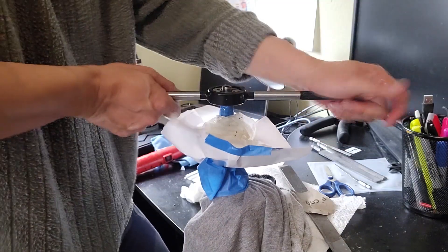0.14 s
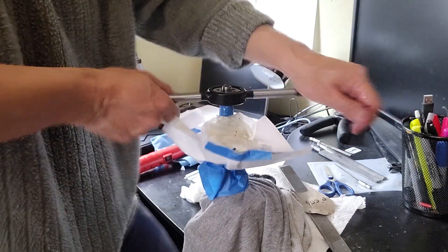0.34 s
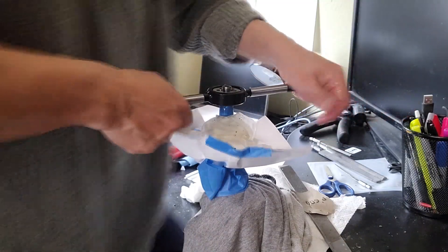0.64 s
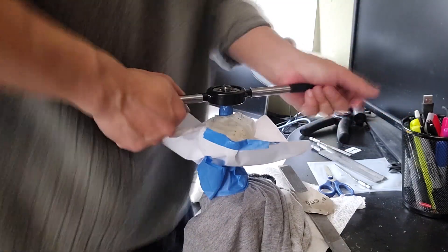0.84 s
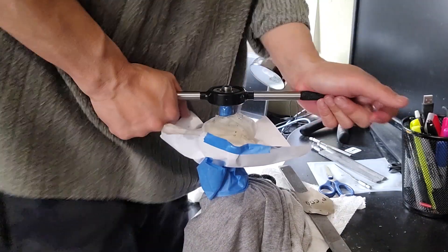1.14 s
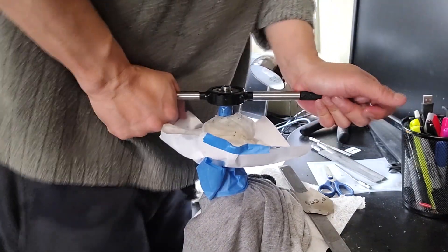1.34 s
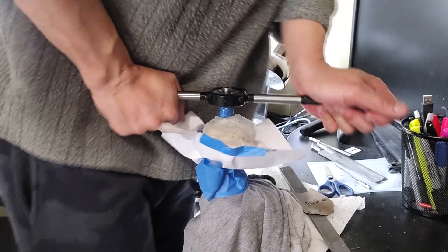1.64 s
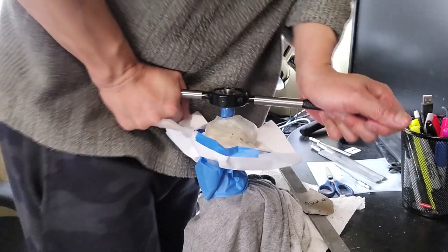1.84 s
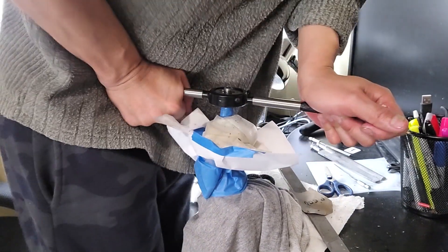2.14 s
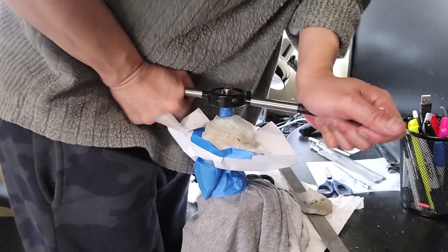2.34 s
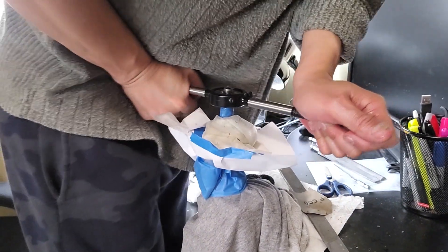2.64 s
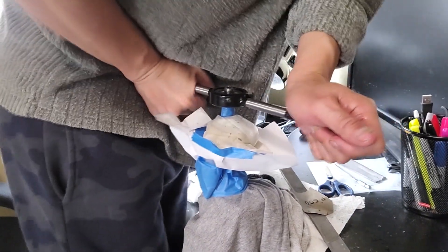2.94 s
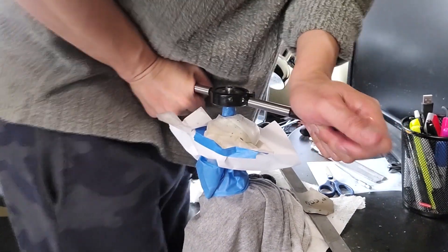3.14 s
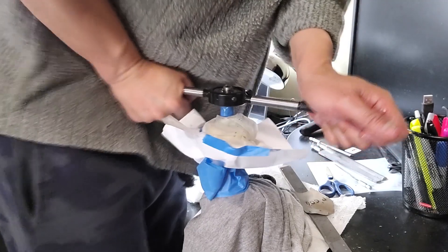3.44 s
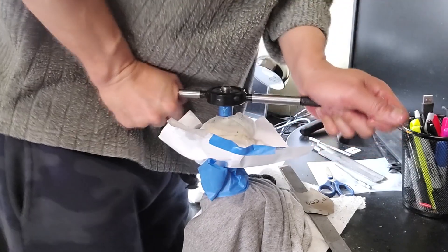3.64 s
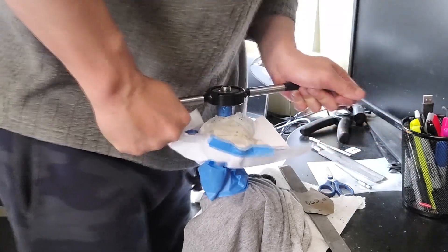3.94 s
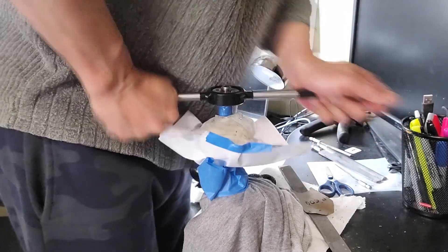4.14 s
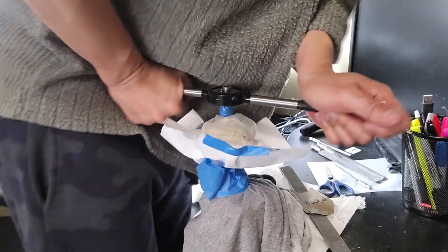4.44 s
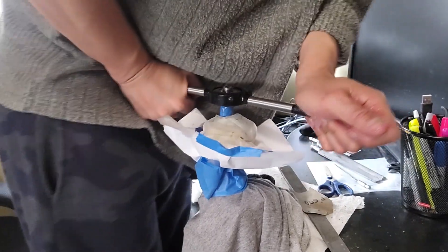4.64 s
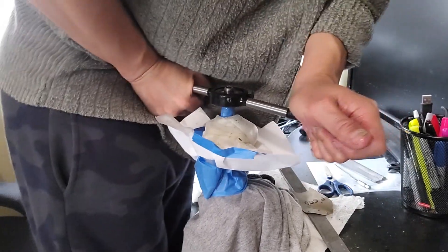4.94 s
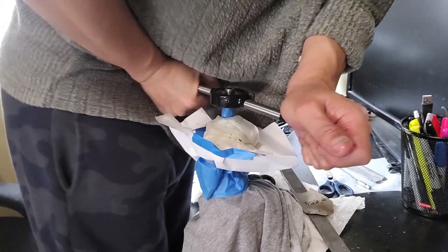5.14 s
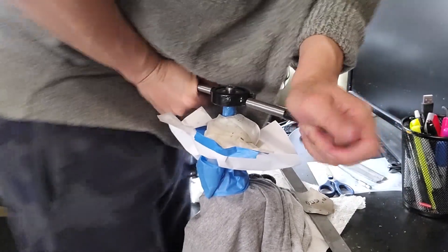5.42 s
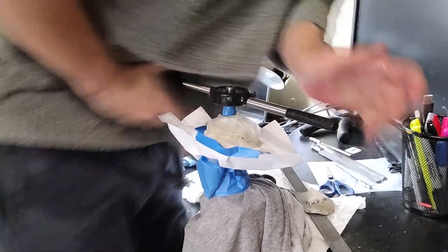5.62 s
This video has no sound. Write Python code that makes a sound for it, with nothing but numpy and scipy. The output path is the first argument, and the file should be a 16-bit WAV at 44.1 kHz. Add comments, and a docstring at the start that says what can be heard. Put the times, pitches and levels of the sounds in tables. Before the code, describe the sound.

Uneven dull knocks and sharp steel clicks from a hand-turned die clamped at a desk, with sleeve brushing paper and faint creaks.

```python
"""A sweater brushes a paper collar over faint grinding and room hush: flickering fibre noise, filtered ticks.
A hand die is worked round an oiled steel barrel clamped upright at a desk in a small room.
The die slips in short judders that ring clamp and desk as damped modes; it chinks and creaks in its holder.
The steel stock clicks in its play: bursts of tiny contacts, filtered; palms rub hollowly on the grips."""
import sys
import numpy as np
from scipy import signal
from scipy.fft import rfft, irfft, next_fast_len
from scipy.io import wavfile
from scipy.ndimage import uniform_filter1d

SR = 44100
rng = np.random.default_rng(int(sys.argv[2]) if len(sys.argv) > 2 else 0)


def file_out(sig):
    """Save sig as 16-bit WAV at sys.argv[1]."""
    # one column per channel
    cols = np.atleast_2d(sig).T
    # limit, then scale
    lim = np.clip(cols, -1, 1)
    pcm = np.round(lim * 32767).astype(np.int16)
    wavfile.write(sys.argv[1], SR, pcm)


N = 254898
TIME = np.arange(N) / SR
HIT_SIZE = 16384  # samples in one hit or room response
TOP_HZ = 15900

# rasp of steel faces: freq_hz, level_db
GRIT_COLOUR = [(500, -11), (1200, -29), (3000, 5), (6000, 4.5), (9000, 3), (15000, -19)]


def undb(db):
    """Decibels to gain."""
    return 10 ** (np.asarray(db) / 20)


def unit(x):
    """Scale to rms 1."""
    return x / np.sqrt(np.mean(x ** 2))


def crest(x, size):
    """Scale so that the loudest stretch of this many samples has rms 1."""
    power = np.mean(np.atleast_2d(x) ** 2, axis=0)
    return x / np.sqrt(uniform_filter1d(power, size, mode="constant").max())


def colour(x, points):
    """Causal minimum-phase filter through (freq_hz, level_db) points."""
    n = x.shape[-1]
    hz, db = np.transpose(points)
    log_hz = np.log(np.fft.rfftfreq(n, 1 / SR) + 1)
    gain = undb(np.interp(log_hz, np.log(hz), db))
    cepstrum = irfft(np.log(gain), n)
    # fold the cepstrum to positive time
    cepstrum[1:n // 2] *= 2
    cepstrum[n // 2 + 1:] = 0
    return irfft(rfft(x) * np.exp(rfft(cepstrum)), n)


def walk(knots_per_s):
    """Random level with straight lines between normal draws."""
    knots = np.arange(0, N / SR + 1, 1 / knots_per_s)
    return np.interp(TIME, knots, rng.standard_normal(len(knots)))


def spread(pair, wide_hz=560, bass_width=0.0067):
    """Two unrelated signals as a diffuse field: alike in the bass, different in the treble."""
    high_pass = signal.butter(1, wide_hz, "high", fs=SR, output="sos")
    side = signal.sosfilt(high_pass, pair[1]) + bass_width * pair[1]
    return pair[0] + np.array([side, -side])


def tilt(left_db):
    """Stereo gains: left raised and right lowered by left_db."""
    return undb(np.array([[left_db], [-left_db]]))


def ports(x, lead_rad=0.47):
    """The two microphone ports differ slightly: the left one shifts the phase a little ahead of the right."""
    analytic = signal.hilbert(x, next_fast_len(N))[:N]
    return np.real(analytic * np.exp(np.array([[1j], [-1j]]) * lead_rad / 2))


def add(track, s, sound):
    """Mix a sound in at time s."""
    start = int(s * SR)
    part = sound[..., :N - start]
    track[..., start:start + part.shape[-1]] += part


def reflections(build_s=0.0055):
    """One stereo path through a small furnished room: noise decaying by band, unit energy."""
    # reverberation: freq_hz, t60_s
    room_t60 = [(100, 0.51), (500, 0.36), (3000, 0.31), (14000, 0.18)]
    t = np.arange(HIT_SIZE) / SR
    hz, t60_s = np.transpose(room_t60)
    edges_hz = np.geomspace(20, SR / 2, 9)
    bins_hz = np.fft.rfftfreq(HIT_SIZE, 1 / SR)
    noise = rfft(rng.standard_normal((2, HIT_SIZE)))
    tail = 0
    for lo, hi in zip(edges_hz, edges_hz[1:]):
        decay_s = np.interp(np.log(lo * hi) / 2, np.log(hz), t60_s)
        band = irfft(noise * (bins_hz >= lo) * (bins_hz < hi))
        tail = tail + band * np.exp(-np.log(1000) * t / decay_s)
    build_up = 1 - np.exp(-t / build_s)
    return unit(spread(tail * build_up)) / np.sqrt(HIT_SIZE)


def room(x):
    """What the room returns of a sound."""
    return signal.fftconvolve(x[None], reflections(), axes=1)[:, :N]


def air(level_db=-71.5):
    """Faint hush of the room: coloured stereo noise with a slight waver."""
    # hush colour: freq_hz, level_db
    air_colour = [(15, -7), (25, -1), (59, -2), (136, -9), (193, -11), (297, -10), (410, -17.5), (804, -30),
                  (1020, -26), (1530, -29.5), (5280, -35.5), (11800, -35), (15500, -37)]
    hush = spread(colour(rng.standard_normal((2, N)), air_colour))
    return unit(hush) * undb(level_db + .5 * walk(22))


def grinding(flutter_db=4.0, room_db=-6, slips_per_s=1200):
    """Countless small slips of the cutting edges through the thread keep the clamp grumbling."""
    # steady grinding: time_s, level_db
    grind_level = [(0.0, -75.5), (0.76, -71), (0.9, -65), (1.11, -64), (1.26, -68.5), (1.66, -74.5),
                   (2.19, -56), (2.45, -73), (2.88, -73.5), (3.2, -53.5), (3.36, -60), (3.67, -68),
                   (4.02, -56.5), (4.13, -64), (4.7, -59), (5.13, -63), (5.29, -71), (5.42, -51),
                   (5.58, -55), (5.78, -62)]
    # its colour: freq_hz, level_db
    grind_colour = [(18, -47.5), (30, -28), (113, 0), (162, -5.5), (191, -11), (260, 0), (322, 1),
                    (412, -11.5), (535, -9.5), (610, -20), (874, -24), (1120, -31), (1500, -38),
                    (2200, -50), (3300, -80)]
    ticks = rng.standard_normal(N) * (rng.random(N) < slips_per_s / SR)
    ticks = ticks * undb(flutter_db * walk(25.007))
    level_db = np.interp(TIME, *np.transpose(grind_level))
    out = unit(colour(ticks, grind_colour)) * undb(level_db)
    return ports(out) + undb(room_db) * room(out)


def fibres(points, grain_db=1.0, flutter_db=3.2, catches_per_s=90):
    """Wool fibres and skin catch and let go in a dense, uneven run of tiny ticks."""
    ticks = rng.standard_normal(N) * (rng.random(N) < .15)
    grains = ticks * undb(grain_db * np.minimum(rng.exponential(size=N), 6))
    return colour(grains * undb(flutter_db * walk(catches_per_s)), points)


def stroke(s, rise_s, fall_s, depth_db=20):
    """Gain of one sliding movement: swells by depth_db over the rise, loses as much over the fall."""
    away = np.maximum((s - TIME) / rise_s, (TIME - s) / fall_s)
    return undb(-depth_db * np.minimum(away, 10))


def rubbing(grip_q=18, grip_db=-4.5):
    """Palms rub on the grips; each cupped hand adds its own hollow resonance."""
    # skin on grip: freq_hz, level_db
    rub_colour = [(200, -54), (450, -13.5), (800, -11), (1080, -13.5), (1400, -19), (2500, -21.5),
                  (6000, -30)]
    # palms sliding round the handles: peak_s, rise_s, fall_s, level_db, hollow_hz
    rub_strokes = [(0.382, 0.027, 0.04, -66, 1000), (0.436, 0.012, 0.035, -62, 1040),
                   (0.476, 0.035, 0.03, -56, 1090), (0.632, 0.03, 0.04, -60, 1040),
                   (0.71, 0.04, 0.03, -55, 1230), (0.75, 0.02, 0.06, -66, 850),
                   (3.846, 0.03, 0.04, -63, 2800), (3.884, 0.025, 0.03, -65, 3500),
                   (3.912, 0.018, 0.05, -51, 1200), (3.972, 0.06, 0.05, -56, 900)]
    skin = unit(fibres(rub_colour))
    out = 0
    for s, rise_s, fall_s, db, hz in rub_strokes:
        hollow = unit(signal.lfilter(*signal.iirpeak(hz, grip_q, fs=SR), skin))
        rub = unit(skin + undb(grip_db) * hollow)
        out = out + undb(db) * stroke(s, rise_s, fall_s) * rub
    return out


def brushing(split_hz=5500, trim_db=-4, rub_db=-2, room_db=2, rub_room_db=-7, left_db=1):
    """Sweater fibres drag over the paper collar, rustling low and hissing high; palms rub on the grips."""
    # sweater on paper, levels before trim: peak_s, rise_s, fall_s, rustle_db, hiss_db
    brush_strokes = [(0.01, 0.2, 0.015, -66, -75), (0.385, 0.028, 0.046, -90, -72),
                     (0.436, 0.011, 0.048, -84, -64), (0.47, 0.032, 0.014, -50.5, -52.5),
                     (0.57, 0.05, 0.079, -63.5, -66), (0.77, 0.066, 0.9, -68.5, -70.5),
                     (0.995, 0.072, 0.045, -57.5, -63), (1.036, 0.05, 0.028, -60.5, -58),
                     (1.105, 0.065, 0.051, -70, -61), (1.22, 0.22, 0.18, -74, -77),
                     (1.5, 0.26, 0.99, -95, -95), (1.73, 0.2, 0.056, -78.5, -100),
                     (1.88, 0.052, 0.23, -79, -74), (2.185, 0.03, 0.035, -80, -74),
                     (3.842, 0.027, 0.15, -72.5, -70), (3.934, 0.039, 0.035, -53.5, -56),
                     (3.99, 0.04, 0.035, -73, -63), (4.205, 0.074, 0.097, -67, -56),
                     (4.7, 0.6, 0.2, -84, -79.5), (5.16, 0.073, 0.16, -85, -95)]
    # paper: freq_hz, level_db
    brush_colour = [(500, -15.5), (1400, -13), (3200, -11), (6000, -10), (9000, -9.5), (12000, -5),
                    (15500, -20.5)]
    paper = fibres(brush_colour)
    low_pass = signal.butter(3, split_hz, "low", fs=SR, output="sos")
    high_pass = signal.butter(3, split_hz, "high", fs=SR, output="sos")
    rustle = unit(signal.sosfilt(low_pass, paper))
    hiss = unit(signal.sosfilt(high_pass, paper))
    brush = np.zeros(N)
    for s, rise_s, fall_s, rustle_db, hiss_db in brush_strokes:
        mix = rustle * undb(rustle_db + trim_db) + hiss * undb(hiss_db + trim_db)
        brush += stroke(s, rise_s, fall_s) * mix
    rub = undb(rub_db) * rubbing()
    wet = room(undb(room_db) * brush + undb(rub_room_db) * rub)
    return (brush + rub + wet) * tilt(left_db)


def ring(push, modes, detune=0.05, scatter_db=2):
    """Damped modes; their pitch and share vary with load and contact point, drawn at random."""
    t = np.arange(HIT_SIZE) / SR
    chance = rng.standard_normal((len(modes), 2))
    body = np.zeros(HIT_SIZE)
    for (hz, db, t60_s), (pitch_draw, level_draw) in zip(modes, chance):
        envelope = undb(db + scatter_db * level_draw - 60 * t / t60_s)
        body += envelope * np.sin(2 * np.pi * hz * (1 + detune * pitch_draw) * t)
    return signal.fftconvolve(push, body)[:HIT_SIZE]


def stutter(length_s, after, count):
    """A first contact, then mostly weaker ones at uneven times."""
    when, size = rng.random(count), rng.standard_normal(count)
    push = np.zeros(HIT_SIZE)
    push[(when * 2 * length_s * SR).astype(int)] = after * size * np.exp(-2 * when)
    push[0] = 1
    return push


def chatter(length_s, grain_db=3):
    """Rough faces meet: a dense burst of tiny contacts that swells at once and dies away."""
    age = np.arange(HIT_SIZE) / SR / length_s
    grains = rng.standard_normal(HIT_SIZE) * undb(grain_db * rng.standard_normal(HIT_SIZE))
    return grains * np.sqrt(age) * np.exp(-2 * age)


def judder(length_s, hz, jitter=0.09, rough_db=3, fade_db=5):
    """Stick-slip jerks that lock to the swing of the clamp and fade as the load lets go."""
    size, late = rng.standard_normal((2, 32))
    when = np.cumsum(1 + jitter * late) / hz
    when -= when[0]
    slipping = np.clip((length_s - when) * hz + 1, 0, 1)
    fade = np.minimum(when / max(length_s, 1 / hz), 2)
    push = np.zeros(HIT_SIZE)
    push[(when * SR).astype(int)] = slipping * undb(rough_db * size - fade_db * fade)
    return push


def slips(clamp_db=-2, desk_db=-4, hard_db=-6, grit_db=-29, room_db=-11, left_db=0.9,
          jolt_s=0.0059, scrape_s=0.018, judder_t60_s=0.029):
    """The die lets go in short, scraping judders that ring the clamp; heavier slips jolt the desk."""
    # slips of the die, levels before trims: start_s, length_s, judder_hz, knock_db, scrape_db
    slip_events = [(0.368, 0.008, 270, -60, -82), (0.771, 0.008, 301, -48.5, -74),
                   (0.831, 0.008, 290, -40, -62), (0.851, 0.014, 306, -25, -40),
                   (0.877, 0.008, 306, -30, -47), (1.227, 0.009, 258, -46, -72),
                   (1.252, 0.009, 258, -50, -76), (1.43, 0.04, 270, -57, -82),
                   (1.715, 0.003, 242, -43, -72), (1.727, 0.003, 260, -41.5, -68),
                   (2.024, 0.025, 270, -49, -60), (2.057, 0.02, 290, -32, -46),
                   (2.179, 0.026, 231, -34, -53), (2.217, 0.01, 265, -36, -56),
                   (2.386, 0.011, 290, -52, -82), (2.604, 0.016, 290, -51, -57),
                   (2.834, 0.02, 265, -40, -67), (2.859, 0.026, 172, -43, -70),
                   (3.043, 0.009, 235, -28.5, -55), (3.063, 0.026, 298, -27, -45),
                   (3.082, 0.016, 310, -30, -48), (3.1, 0.012, 298, -28.5, -48),
                   (3.127, 0.012, 400, -32, -35.5), (3.28, 0.009, 277, -44, -66),
                   (3.388, 0.018, 285, -51, -75), (3.431, 0.009, 285, -32, -50),
                   (3.471, 0.004, 220, -42, -60), (3.608, 0.008, 288, -47.5, -78),
                   (4.007, 0.005, 271, -42, -72), (4.252, 0.012, 279, -42, -62),
                   (4.299, 0.008, 280, -35, -45), (4.324, 0.05, 240, -41, -50),
                   (4.425, 0.018, 270, -43, -58), (4.593, 0.034, 228, -35.5, -64),
                   (4.818, 0.037, 280, -49, -66), (4.987, 0.024, 295, -32.5, -57),
                   (5.06, 0.006, 260, -39, -70), (5.077, 0.018, 212, -45, -75),
                   (5.314, 0.012, 253, -39, -70), (5.335, 0.009, 285, -27.5, -44),
                   (5.356, 0.021, 305, -27.5, -46), (5.374, 0.018, 330, -33, -48),
                   (5.396, 0.016, 270, -36, -51), (5.428, 0.04, 300, -39.5, -54),
                   (5.533, 0.008, 290, -46, -70), (5.607, 0.014, 285, -43, -68)]
    # desk jolts, level before trim: start_s, thud_db, extra_sway_db
    thud_events = [(0.02, -55, 25), (0.854, -34, -5), (0.87, -30, -27), (0.893, -41, 8), (2.033, -49, -17),
                   (2.061, -40.5, -12), (2.182, -46.5, 3), (2.604, -57, -18), (2.846, -50.5, 2.5),
                   (3.045, -43, -30), (3.067, -27, 8), (3.084, -28, 7), (3.123, -31, -12), (3.427, -46, -5),
                   (3.718, -46, 13), (4.299, -34.5, -7), (4.345, -35, 12.5), (4.393, -41, -13),
                   (4.594, -45.5, 12), (5.061, -55.5, 5), (5.336, -25.5, -5), (5.357, -29, -9),
                   (5.395, -30.5, -14), (5.612, -49.5, 12), (5.641, -46.5, -28)]
    # soft push of an oiled slip: freq_hz, level_db
    soft_push = [(40, -25.5), (160, 3), (300, 2), (500, 6), (750, -5), (1500, -42), (3000, -72.5)]
    # push into the desk: freq_hz, level_db
    deep_push = [(20, -24.5), (55, -2), (170, 1), (400, -4), (1000, -51.5)]
    # push of the dry scrape: freq_hz, level_db
    hard_push = [(100, -28), (480, -16.5), (1100, -9), (2500, -12), (6000, -16)]
    # clamp and barrel, relative to the judder: freq_hz, level_db, t60_s
    clamp_modes = [(166, -13.5, 0.18), (216.3, -11, 0.11), (309.4, -19.5, 0.28), (461.6, -33, 0.2)]
    # their ring under the scrape: freq_hz, level_db, t60_s
    hard_modes = [(560, -15.5, 0.027), (733, -4.5, 0.049), (776, -15, 0.044), (930, -8, 0.018),
                  (1233, -4.5, 0.0057)]
    # desk top: freq_hz, level_db, t60_s
    desk_modes = [(78.5, -5, 0.16), (116.4, -5, 0.2), (148.7, -11, 0.16)]
    # desk swaying on its legs, level before the extra: freq_hz, level_db, t60_s
    desk_sway = (46, -6, 0.15)
    out = np.zeros(N)
    for s, length_s, hz, knock_db, scrape_db in slip_events:
        modes = [(hz, 0, judder_t60_s)] + clamp_modes
        knock = ring(colour(judder(length_s, hz), soft_push), modes, detune=0.054)
        add(out, s, undb(knock_db + clamp_db) * crest(knock, size=300))
        scrape = ring(colour(chatter(scrape_s), hard_push), hard_modes)
        add(out, s, undb(scrape_db + hard_db) * crest(scrape, size=300))
        rasp = colour(chatter(scrape_s), GRIT_COLOUR)
        add(out, s, undb(scrape_db + grit_db) * crest(rasp, size=300))
    sway_hz, sway_db, sway_t60_s = desk_sway
    for s, thud_db, extra_db in thud_events:
        push = colour(stutter(jolt_s, after=0.39, count=4), deep_push)
        modes = desk_modes + [(sway_hz, sway_db + extra_db, sway_t60_s)]
        thud = ring(push, modes, detune=0.052)
        add(out, s, undb(thud_db + desk_db) * crest(thud, size=900))
    return ports(out) * tilt(left_db) + undb(room_db) * room(out)


def contact(modes, length_s, detune):
    """One gritty touch of steel on steel: a rasp and the ring that it leaves."""
    push = chatter(length_s)
    ringing = crest(ring(push, modes, detune), size=130)
    rasp = crest(colour(push, GRIT_COLOUR), size=130)
    return crest(ringing + rasp, size=130)


def chinks(contact_s=0.0083, room_db=-5):
    """As the hands let go, the loose die touches its holder lightly and rings for a moment."""
    # chinks: start_s, level_db
    chink_events = [(0.08, -74), (0.097, -76), (0.109, -73), (0.131, -64.5), (0.149, -67.5), (0.159, -57.5)]
    # loose die: freq_hz, level_db, t60_s
    die_modes = [(2100, -3, 0.014), (3480, 4, 0.009), (5080, 9, 0.009), (6500, 4, 0.006), (7830, -2, 0.008),
                 (12100, -3, 0.006)]
    out = np.zeros(N)
    for s, db in chink_events:
        add(out, s, undb(db) * contact(die_modes, contact_s, detune=0.015))
    return out + undb(room_db) * room(out)


def clicks(room_db=-1, left_db=2, stock_reach=1.56):
    """The stock shifts in its play: a chatter of contacts, with the ring damped by the hands."""
    # steel on steel, room before trim: start_s, length_s, ring_db, low_ring_db, crack_db, crack_hz, room_db
    click_events = [(0.7179, 0.0075, -53.5, -50.5, -69, 3480, 0.5),
                    (0.8525, 0.007, -39.5, -40, -47, 5100, 4), (0.864, 0.006, -64, -60, -66, 5000, 2.5),
                    (0.978, 0.018, -54.5, -51.5, -56, 9000, 1),
                    (1.158, 0.0077, -53, -49.5, -54, 10600, -4.5),
                    (1.8611, 0.0021, -60.5, -64, -53.5, 9100, 1), (2.084, 0.0017, -71, -68, -58, 12500, 7),
                    (2.148, 0.0067, -53, -52, -54, 12500, 4), (2.153, 0.0014, -50, -45, -41.5, 6700, -2),
                    (2.164, 0.0072, -46.5, -45.5, -47, 6000, -12.5), (2.6, 0.0071, -54, -50, -59, 6500, 8),
                    (2.928, 0.0023, -77, -69, -89, 5900, -6), (3.0064, 0.0068, -76, -63, -93, 3980, 2),
                    (3.371, 0.0015, -74, -71, -70.5, 6400, 4),
                    (3.4697, 0.0026, -70.5, -60.5, -72.5, 9800, 6),
                    (3.9628, 0.0028, -47.5, -52, -78, 3970, -5.5),
                    (4.1629, 0.0043, -35, -36.5, -35, 5000, -4.5),
                    (4.289, 0.0059, -41, -37, -45.5, 5200, 1), (4.378, 0.0014, -60, -47, -65, 2520, -9),
                    (4.4207, 0.0051, -64.5, -59, -67.5, 9100, 6.5),
                    (4.506, 0.0017, -74, -60, -77, 3000, -3), (4.982, 0.0079, -72, -62, -84, 4040, -2.5),
                    (5.7417, 0.006, -51.5, -72, -53, 6900, 10.5),
                    (5.7444, 0.00092, -47, -56.5, -41.5, 9400, 4), (5.758, 0.025, -43, -52, -41.5, 5660, 7),
                    (5.767, 0.0063, -48, -49, -46, 13000, 4)]
    # stock, many close damped modes: freq_hz, level_db
    stock_colour = [(400, -7), (1000, -25), (1500, -21.5), (1950, 4), (2250, 4), (2900, 3), (3700, -1.5),
                    (4700, -1), (5800, -13.5), (8000, 0), (15000, -22)]
    # its low ring: freq_hz, level_db
    low_colour = [(150, -8), (450, 0), (650, -4.5), (900, -3), (1250, -5.5), (2000, -7.5), (5000, -113)]
    # crack of a contact: multiple_of_crack_hz, level_db
    crack_shape = [(0.12, -68), (0.36, -51), (0.7, -4.5), (1.002, -1), (1.5, -4.5), (2.3, -17.5)]
    out = np.zeros((2, N))
    for s, length_s, ring_db, low_db, crack_db, hz, wet_db in click_events:
        # the handles keep turning, so every click takes its own path through the room
        direct = unit(chatter(length_s)) / np.sqrt(HIT_SIZE)
        push = direct + undb(wet_db + room_db) * reflections()
        # the stock rings up to a multiple of the crack's pitch
        low_pass = signal.butter(3, min(stock_reach * hz, TOP_HZ), fs=SR, output="sos")
        blunted = signal.sosfilt(low_pass, push)
        crack = colour(push, [(multiple * hz, db) for multiple, db in crack_shape])
        add(out, s, undb(ring_db) * crest(colour(blunted, stock_colour), size=130))
        add(out, s, undb(low_db) * crest(colour(push, low_colour), size=130))
        add(out, s, undb(crack_db) * tilt(left_db) * crest(crack, size=130))
    return out


def creak(tick_s=0.0035, room_db=-1):
    """Under rising load the die creeps in its holder in separate gritty stick-slip ticks."""
    # ticks: start_s, level_db
    creak_ticks = [(1.973, -70), (2.011, -77), (2.026, -67), (2.044, -58.5), (2.056, -63), (2.069, -62),
                   (2.098, -68), (2.112, -59), (2.126, -61), (2.135, -57), (2.14, -54.5)]
    # holder under load: freq_hz, level_db, t60_s
    holder_modes = [(1200, 11, 0.012), (1520, 9, 0.023), (3400, 16.5, 0.0037), (4970, -11, 0.01),
                    (5700, 4, 0.013), (6460, 2, 0.016)]
    out = np.zeros(N)
    for s, db in creak_ticks:
        add(out, s, undb(db) * contact(holder_modes, tick_s, detune=0.05))
    return out + undb(room_db) * room(out)


def scene():
    """Die, stock and paper in the quiet room."""
    return air() + grinding() + brushing() + slips() + chinks() + clicks() + creak()


def record(dry):
    """The microphone drops the deepest bass and cuts the top."""
    high_pass = signal.butter(2, 30, "high", fs=SR, output="sos")
    low_pass = signal.ellip(10, .2, 70, TOP_HZ, fs=SR, output="sos")
    return signal.sosfilt(low_pass, signal.sosfilt(high_pass, dry))


dry = scene()
out = record(dry)
file_out(out)
```